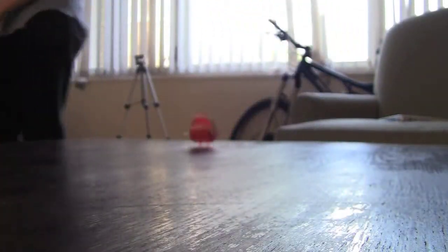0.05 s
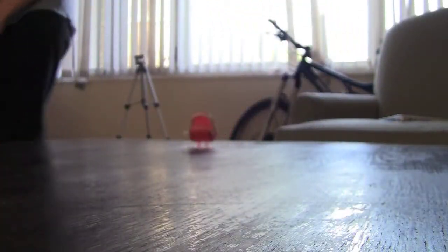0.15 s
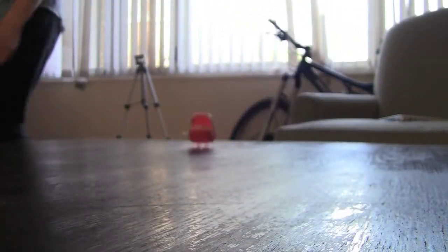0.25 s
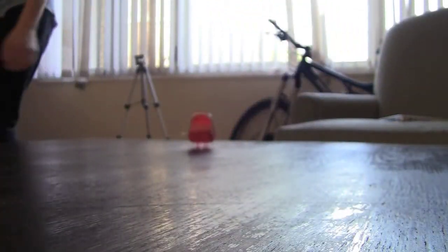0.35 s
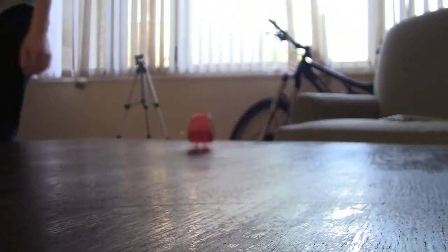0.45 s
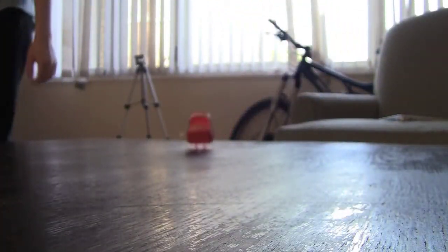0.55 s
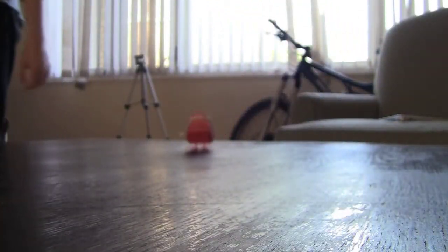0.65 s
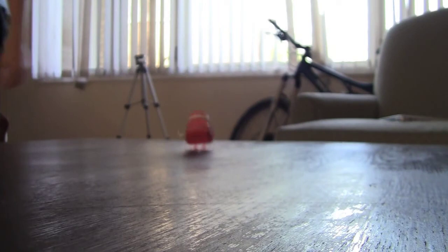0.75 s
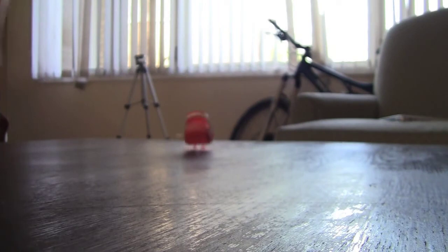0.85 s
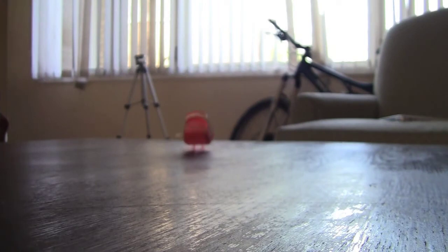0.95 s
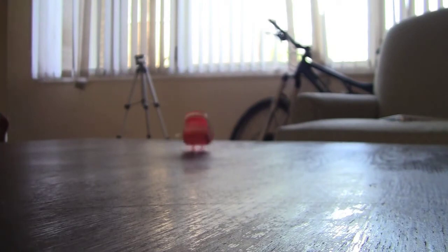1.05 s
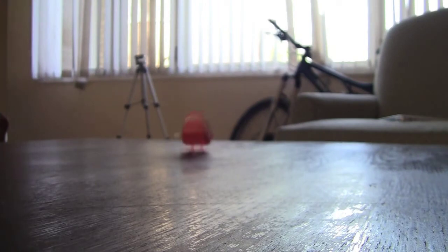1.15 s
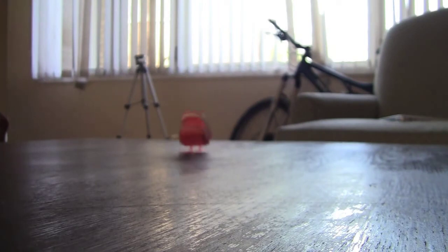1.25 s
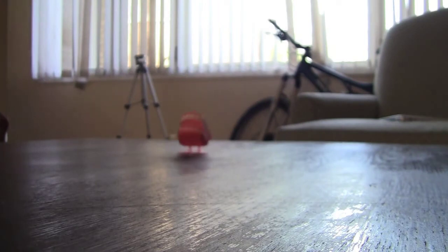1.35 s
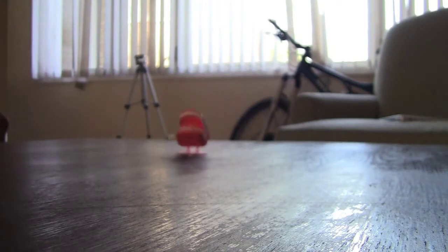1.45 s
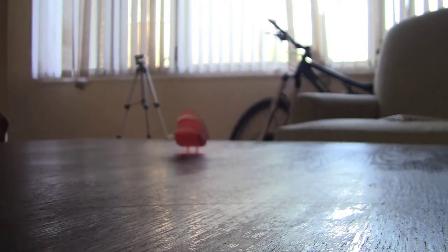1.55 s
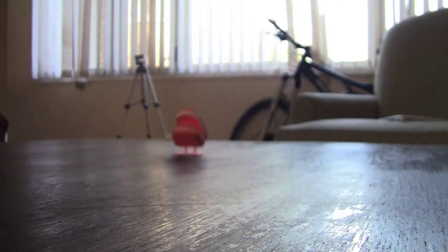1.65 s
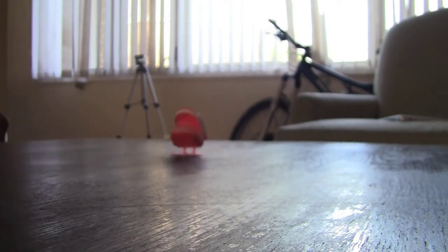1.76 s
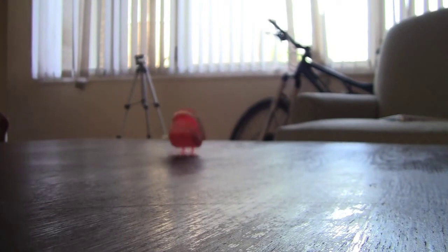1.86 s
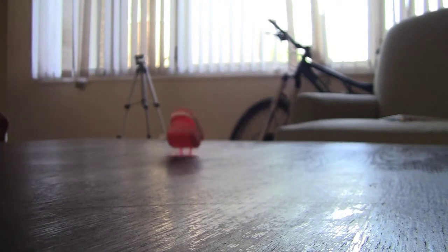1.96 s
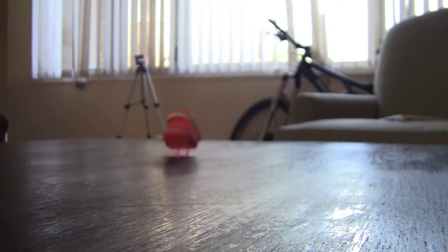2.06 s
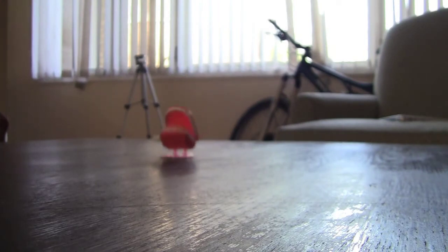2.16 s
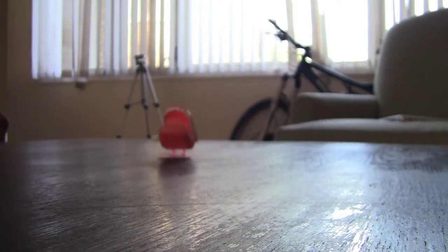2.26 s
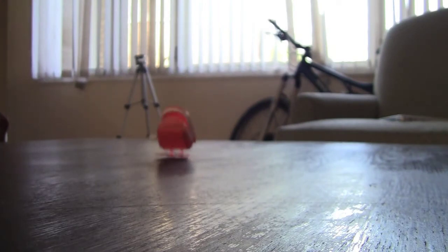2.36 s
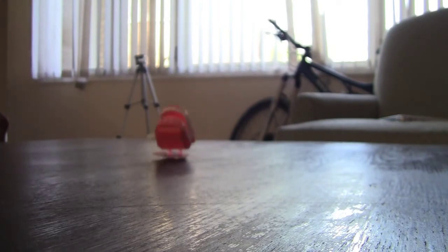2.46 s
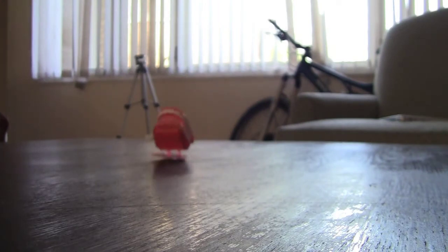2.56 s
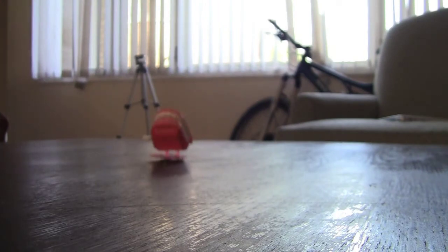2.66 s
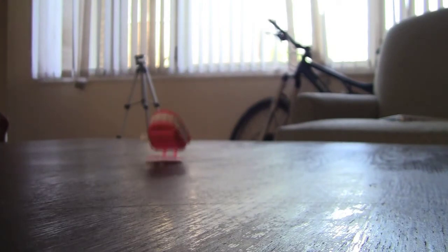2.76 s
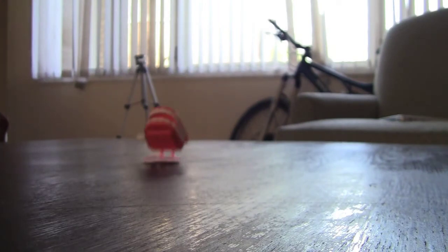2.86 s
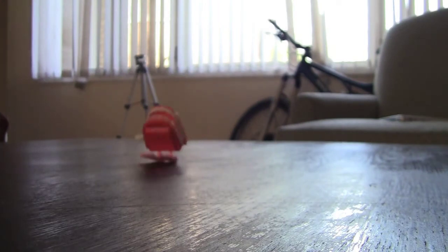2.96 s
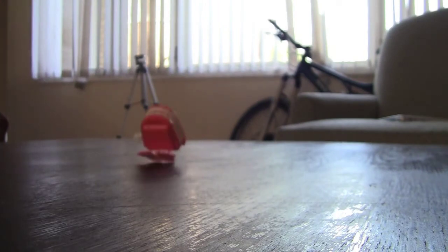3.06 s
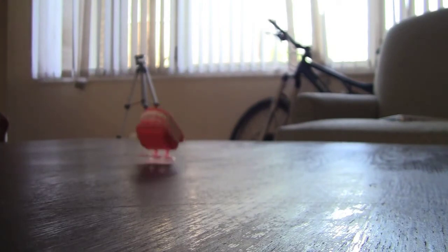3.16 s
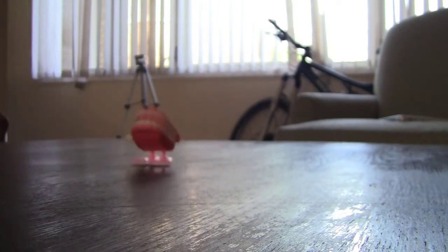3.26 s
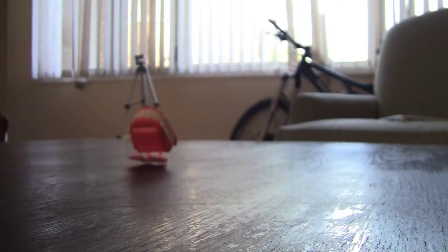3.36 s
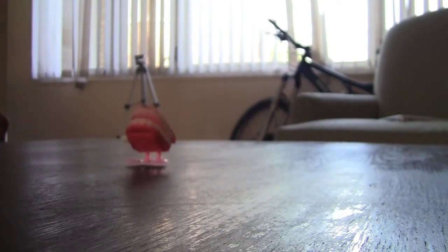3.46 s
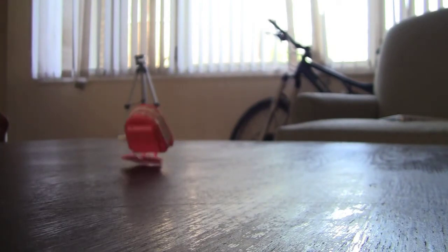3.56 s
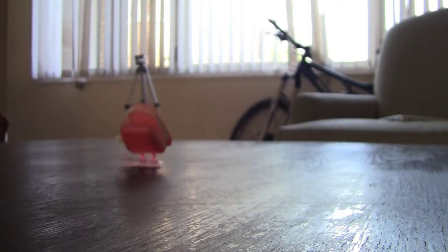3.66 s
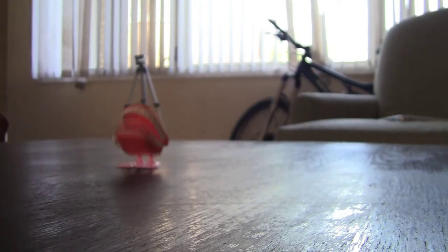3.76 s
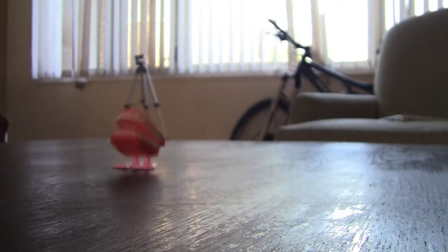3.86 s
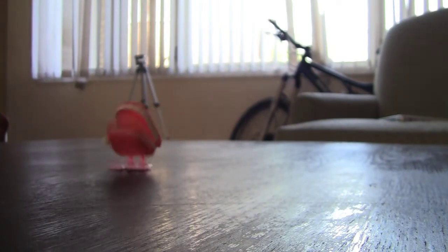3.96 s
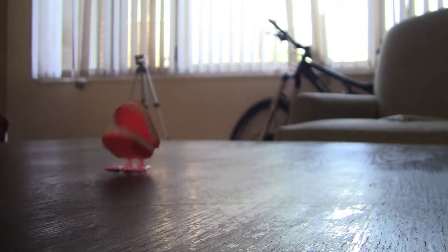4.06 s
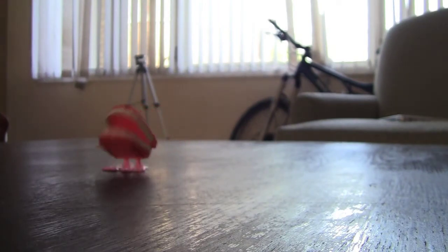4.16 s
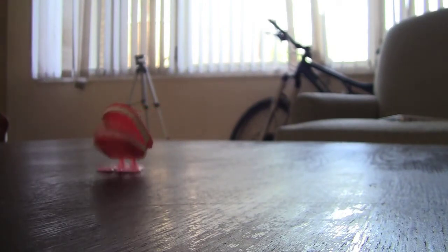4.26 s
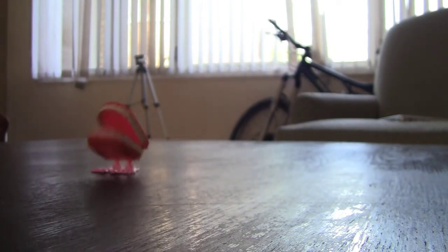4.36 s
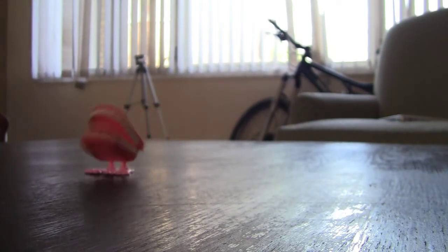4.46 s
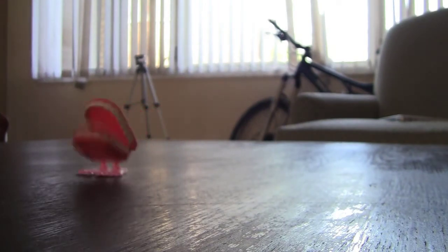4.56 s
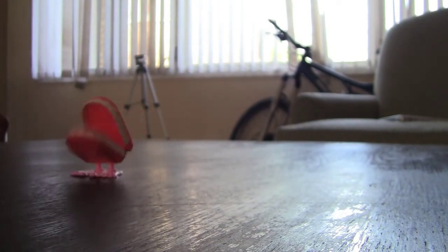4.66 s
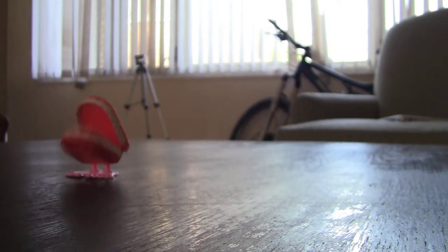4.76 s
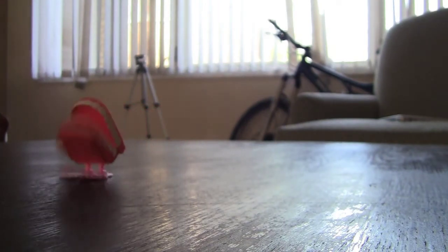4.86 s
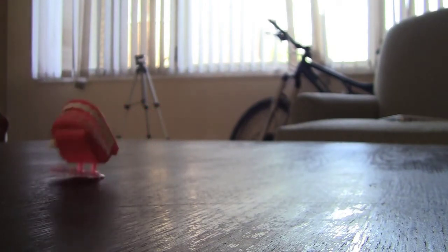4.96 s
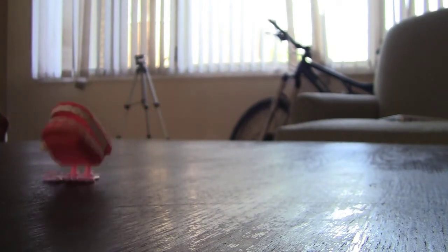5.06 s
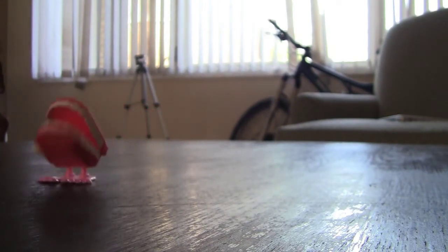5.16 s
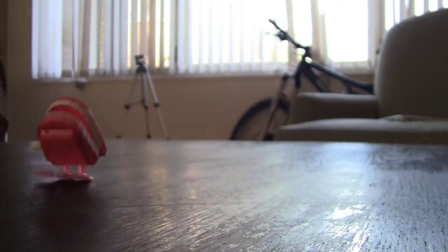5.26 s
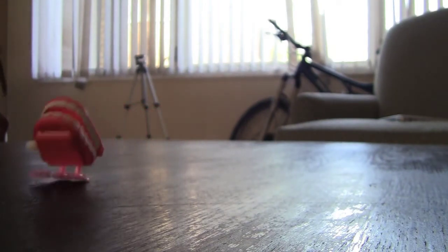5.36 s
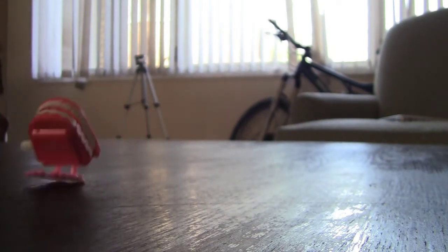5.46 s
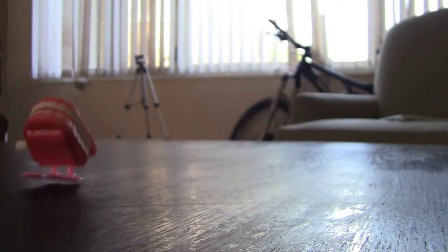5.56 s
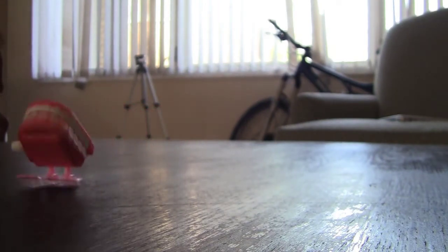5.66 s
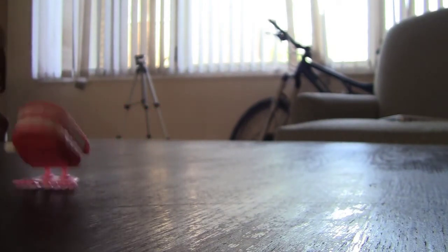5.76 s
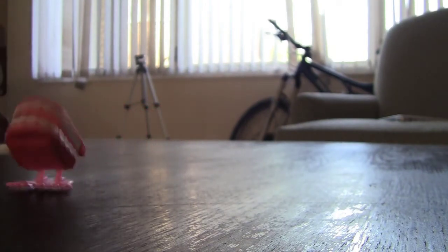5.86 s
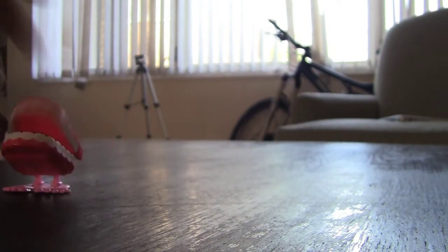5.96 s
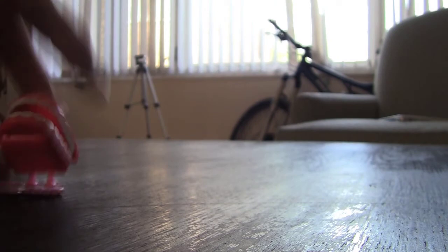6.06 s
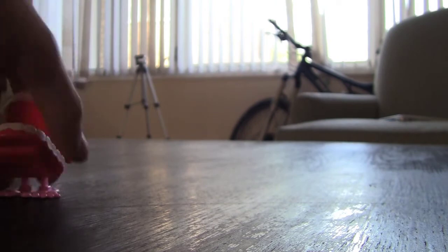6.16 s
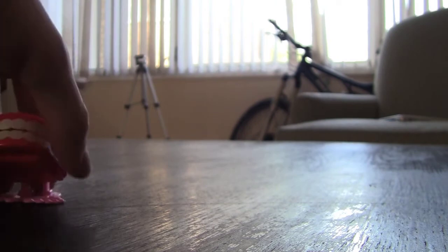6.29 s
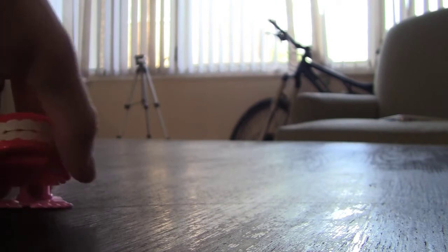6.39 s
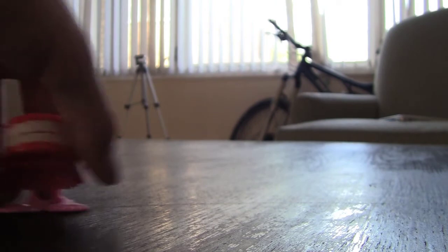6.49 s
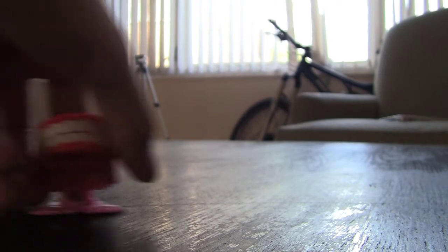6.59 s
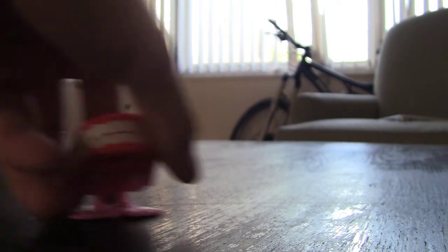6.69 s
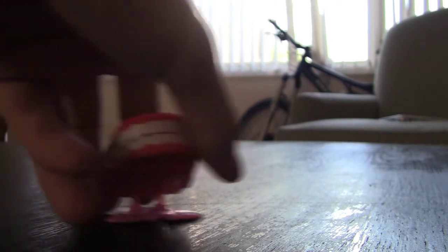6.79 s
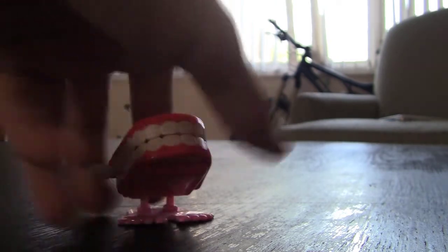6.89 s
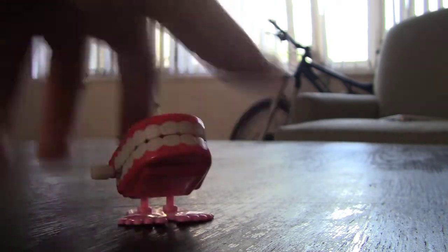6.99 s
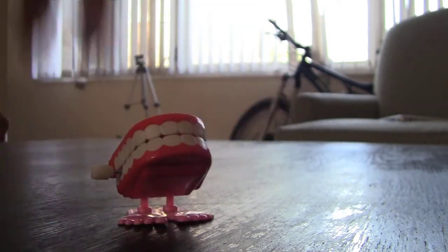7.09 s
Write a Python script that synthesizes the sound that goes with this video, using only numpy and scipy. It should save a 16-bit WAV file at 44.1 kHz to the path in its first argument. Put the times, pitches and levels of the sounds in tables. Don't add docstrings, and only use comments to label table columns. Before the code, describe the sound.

A small wind-up toy snaps its plastic jaws about ten times a second on wood, then is caught, handled and set down in a quiet room.

```python
import sys
import numpy as np
from scipy import signal
from scipy.fft import rfft, irfft
from scipy.io import wavfile
from scipy.ndimage import uniform_filter1d

SR = 44100
rng = np.random.default_rng(int(sys.argv[2]) if len(sys.argv) > 2 else 0)


def file_out(sig):
    cols = np.atleast_2d(sig).T
    lim = np.clip(cols, -1, 1)
    pcm = np.round(lim * 32767).astype(np.int16)
    wavfile.write(sys.argv[1], SR, pcm)


def level_to_linear(level):
    exponent = np.asarray(level, float) / 20
    return 10 ** exponent


N = 314433

# (frequency [Hz], density [dB per Hz])
RUSTLE_COLOUR = [(900, -11.5), (2500, -8), (3300, -15.5), (4300, -12.5), (5900, -19.5), (7000, -17.5),
                 (11500, -21), (15000, -52)]
RUSTLE_DB = -53.5
# (time [s], level [dB])
SLEEVE = [(0, 6), (6.45, 5), (6.58, 3.5), (6.68, 3), (6.85, 6), (7.0, 0), (7.13, -4)]
# (frequency [Hz], level [dB])
HUM = [(326, -62), (361, -56), (520, -63), (740, -61.5)]
# (frequency [Hz], level [dB])
MOTORS = [(121.2, -49.5), (102, -55.5)]
MOTORS_MEET_S = 6.835
# (time [s], level [dB])
RUMBLE = [(0, -37), (2.4, -44.5), (6.15, -51.5), (6.25, -42.5), (6.45, -39), (6.65, -41), (6.85, -43),
          (7.13, -43)]
# (frequency [Hz], density [dB per Hz])
RUMBLE_COLOUR = [(15, -65), (25, -16), (64, -11), (108, -1), (212, -2), (306, 0.5), (578, -3.5),
                 (866, -16.5), (1030, -6), (1130, -15.5), (2500, -47), (3250, -64), (5500, -120)]
AIRBORNE_DB, AIRBORNE_S = -11, 0.046

# (time [s], rattle level [dB])
GEARS = [(0, -30.5), (1, -31), (3, -37.5), (5, -39.5), (6.05, -42), (6.12, -45.5), (6.25, -40), (6.4, -75),
         (6.55, -75)]
# (frequency [Hz], density [dB per Hz])
GEAR_COLOUR = [(900, -5), (1500, -9), (2500, 0), (3400, -2.5), (4050, -4.5), (4500, -7.5), (5000, -2.5),
               (6200, -7.5), (6800, -0.5), (7500, -8.5), (9900, -14.5), (11000, -10.5), (12000, -20),
               (15000, -85)]
# (frequency [Hz], level [dB], t60 [s])
CASING = [(4520, -11.5, .022), (6760, -15.5, .014), (9800, -13, 0.013), (2640, -17, 0.016)]

# (cam lift [s], jaw snap [s], lift [dB], snap [dB])
CAM_TURNS = [(.0212, .0381, -16.5, -3.5), (.101, .1286, -13.5, -10.5), (.2221, .2396, -15, -3.5),
             (.302, .3346, -15.5, -8), (.4146, .4446, -11, -5), (.5201, .5532, -10.5, -5),
             (.6279, .6497, -11.5, -6.5), (.7182, .7459, -12, -6), (.8247, .8399, -10, -1),
             (.9278, .9429, -9.5, -3), (1.0299, 1.0498, -14, -3.5), (1.1242, 1.1463, -12, -5),
             (1.2201, 1.2467, -11, -7), (1.3244, 1.3381, -9.5, -5), (1.4239, 1.4444, -10.5, -3.5),
             (1.5202, 1.5359, -11.5, -5), (1.6177, 1.6423, -13, -8.5), (1.7195, 1.7377, -12, -4),
             (1.8073, 1.8339, -14.5, -8), (1.9214, 1.952, -12.5, -9), (2.027, 2.0547, -13, -8),
             (2.1262, 2.151, -13.5, -11.5), (2.2211, 2.2424, -16.5, -5), (2.31, 2.3531, -17, -6.5),
             (2.432, 2.4693, -14, -9), (2.5422, 2.5781, -13, -8), (2.6475, 2.6782, -15, -4),
             (2.7441, 2.7689, -15.5, -8), (2.8477, 2.862, -16.5, -6), (2.9501, 2.9589, -17.5, -10),
             (3.055, 3.0845, -15.5, -9), (3.159, 3.1973, -13.5, -6), (3.283, 3.3097, -13, -5),
             (3.3839, 3.4032, -12.5, -3), (3.4733, 3.4994, -14.5, -7), (3.5785, 3.597, -15, -3.5),
             (3.6684, 3.7043, -15, -8.5), (3.788, 3.822, -15.5, -5), (3.8994, 3.9285, -16, -8.5),
             (4.0074, 4.0262, -14, -3), (4.096, 4.1312, -17, -8.5), (4.216, 4.2425, -17.5, -7),
             (4.314, 4.337, -14, -3.5), (4.406, 4.435, -14, -7.5), (4.5126, 4.541, -13.5, -6.5),
             (4.6227, 4.642, -15, -2.5), (4.707, 4.744, -16.5, -7.5), (4.82, 4.8487, -15.5, -7),
             (4.922, 4.9628, -16, -7.5), (5.039, 5.0735, -12, -4), (5.1548, 5.1754, -13, -2.5),
             (5.251, 5.2691, -17, -2.5), (5.345, 5.3739, -15, -9), (5.459, 5.4887, -14.5, -8),
             (5.5632, 5.602, -15, -8), (5.6771, 5.71, -14, -8), (5.7853, 5.811, -16, -7),
             (5.89, 5.9036, -12.5, -0.5), (5.9855, 6.0013, -12.5, 1)]
HOPS = CAM_TURNS
# (snap tick lean [dB an octave], spring ring [dB], latch [dB])
QUIRKS = [(-1, 10, 2.5), (0.0, 9, 6), (2, 12, 0.0), (7, 2, 2), (6, -4.0, 1), (1, 14, 2), (0, 5, 7),
          (4.5, -0.5, -8), (-3.0, 9, 0.0), (-1, -1.5, 0.0), (1, -8.5, 4), (4, 7, 4.5), (3, 0.0, -4),
          (-10, -1.5, 0.0), (8, 6, 9), (-6, 7, 0.0), (1.0, 7, -1.5), (-2, -12.0, 0.0), (1.5, 10.5, 1.5),
          (1, -19.0, 1), (2, -5, 3), (1.0, 9, 4), (3.5, 7, 4), (0.0, -6, 0), (-2, -7.5, -3), (5, -4.5, 1),
          (-1, -6.0, 1), (0.5, 4.5, 6), (-5, 6, 0.0), (2, 2, 0.0), (-2.5, 10, 0.5), (4.5, 3, 1), (1, 1, 3),
          (-5, 4, 0.0), (-2.0, 6.5, 3), (-3, 1, 0.0), (6, 7.5, 1.0), (8.5, -9.5, 2.5), (0, 8, 3.5),
          (-5, 1.5, 0.0), (5.5, 9, 3.5), (2.5, -16.5, 4.5), (1, 6, -4), (3, 9, 0), (1, 7, -1),
          (-1.5, 4, 0.0), (6, -10, 0), (-1, 0.0, 3.5), (-3, -12.5, 0), (2, -2, 1.0), (2, 6, 4.5),
          (-4.5, -12, 0.0), (2, -7.0, 1.0), (0, 7, 0), (3, 2.0, -0.5), (7, 1, -0.5), (1, -9, 3),
          (-4, 2.0, 0.0), (-4, -8.0, 0.0)]
# (snap knock lean [dB an octave], latch lateness [ms])
SKEWS = [(1.0, 0.0), (5, 0.3), (2, 0.0), (11, -0.6), (3, 1.5), (-1, 0.6), (-1.5, 0), (-1.5, 1), (-1.5, 0.0),
         (1, 0.0), (0, 2.7), (-1.5, 1.5), (0, 1), (3, 0.0), (0, -0.1), (-5.5, 0.0), (-0.5, 3), (-3, 0.0),
         (0, -1), (-1.5, 1), (1, 0), (-4, 2.5), (-3, 0.5), (-3.5, 0.2), (-10, -1), (3, 2), (0, 1),
         (-1.5, 4), (-2.5, 0.0), (-1.5, 0.0), (-1.5, -0.5), (-1.5, 0.4), (-2.5, 0.6), (-0.5, 0.0),
         (0, -0.5), (1, 0.0), (-5.5, 0.5), (0.5, 0.0), (-1.5, 0.4), (-3, 0.0), (-3, -1.0), (4, -2),
         (0.5, 0.1), (-1, 0.6), (-2, 0.5), (-1, 0.0), (-4, -1.3), (0.5, -0.8), (-5, 0.2), (-1, 1),
         (-1.5, 0.1), (-3, 0.0), (1, -2), (1.5, -0.5), (-1.0, 0.0), (-0.5, -0.5), (-2.5, -0.2), (-5, 0.0),
         (-4, 0.0)]
# (time [s], shell level [dB], table level [dB])
REBOUNDS = [(0.091, -25, -34), (0.358, -42, -23.5), (0.476, -17.5, -21), (0.5863, -15.5, -19),
            (0.6993, -19, -20.5), (.78, -22, -20.5), (0.8976, -16, -20), (0.996, -23, -20),
            (1.18, -22, -21.5), (1.3997, -17, -21), (1.4853, -23, -23), (1.7895, -13, -32),
            (1.972, -25, -24.5), (2.0907, -26, -28.5), (2.1921, -22.5, -25.5), (2.2883, -25, -30),
            (2.495, -23, -27), (2.6046, -22, -24.5), (2.7043, -24, -32), (2.9196, -22, -26),
            (3.0217, -18, -26.5), (3.4524, -20, -30), (4.079, -18, -31), (4.4651, -26, -30),
            (4.761, -24, -31), (4.979, -20, -23.5), (5.1002, -23, -29), (5.31, -20, -29.5),
            (5.8416, -27, -31), (6.0435, -18.5, -24.5)]

# (frequency [Hz], level [dB], t60 [s])
TABLE = [(128, -4.5, 0.18), (187, 5, 0.053), (244, -1, 0.073), (318, 0.5, 0.13), (405, 4, 0.089),
         (530, -0.5, 0.081), (769, 5, 0.045), (867, 3, 0.057), (1036, 3.5, 0.063), (1161, 1.5, 0.056),
         (1362, 7, 0.032), (1705, 5, 0.016)]
# (time [s], middle modes [dB], top modes [dB])
EDGE = [(0, 0, 9.5), (2.3, 12, 7.5), (3.5, -9, 3), (5, 6, 3.5), (6.2, 2.5, 8.5)]
# (time [s], level [dB])
FOOTFALL = [(0, -28.5), (.6, -27), (2.2, -27.5), (3.5, -32), (5, -31.5), (6, -32.5)]
FOOT_LEAD_S, FOOT_SHARE, USUAL_LIFT_DB = 0.00153, 1, -18
# (time [s], level [dB])
TOUCHES = [(1.079, -22), (1.274, -20.5), (1.58, -25.5), (1.668, -25), (1.856, -27), (1.909, -28),
           (2.112, -34), (2.418, -31), (2.527, -27), (2.633, -28), (2.803, -25.5), (3.104, -29),
           (3.144, -27), (3.214, -24.5), (3.269, -29), (3.345, -24.5), (3.518, -37), (3.64, -30),
           (3.954, -28.5), (4.375, -28), (4.571, -31), (4.611, -37), (4.866, -38), (4.907, -34),
           (5.512, -31.5), (5.547, -42), (5.728, -26.5), (5.952, -25)]
TOUCH_DB = -2
# (time [s], level [dB])
TAPS = [
    (0.152, -18),
    (0.161, -16),
    (0.192, -18),
]
# (frequency [Hz], level [dB], t60 [s])
TAP_MODES = [(1223, -4, 0.008), (1490, 3.5, 0.011), (1750, 3, 0.0086), (2050, -12, 0.0078)]
# (time [s], level [dB])
BUMPS = [
    (6.216, -20.5),
    (6.224, -30),
    (6.237, -25),
    (6.249, -39),
    (6.27, -28.5),
    (6.294, -29.5),
]

# (frequency [Hz], level [dB], t60 [s])
CAM_KNOCK = [(1560, -29, 0.0051), (2230, 3.5, 0.003), (2710, 5, 0.0076), (3960, 0.5, 0.013),
             (4560, -52, 0.0024)]
# (frequency [Hz], level [dB], t60 [s])
CAM_TICK = [(5306, -1.5, 0.0072), (5740, -1, 0.005), (6780, 2.5, 0.0048), (8650, -7, 0.0081),
            (9460, -5, 0.0074), (10500, 5.5, 0.0037), (13500, -32, 0.0027)]

# (frequency [Hz], level [dB], t60 [s])
KNOCK = [(1484, -8.5, 0.0028), (2237, 4.5, 0.0018), (2830, 4.5, 0.0024), (3492, -5, 0.006),
         (3860, -6.5, 0.0044), (4437, -9.5, 0.011)]
# (frequency [Hz], level [dB], t60 [s])
TICK = [(5096, -6.5, 0.014), (5710, -6, 0.0095), (6716, -0.5, 0.013), (8107, 0.5, 0.0087),
        (8995, 2.5, 0.011), (9720, 2, 0.015), (10440, 5, 0.0038), (13360, -18, 0.0089)]
# (frequency [Hz], level [dB], t60 [s])
GRIPPED = [(1710, -7, 0.0035), (2305, -2, 0.0053), (2870, -4.5, 0.006), (3990, -9.5, 0.0051),
           (5710, -8.5, 0.0031)]
# (time [s], slope [dB an octave])
TICK_LEAN = [(0, 10), (.3, -3), (.8, 3), (2, -1), (3.2, 0.5), (4.5, -0.5), (6.1, -0.5), (6.25, -3),
             (7.1, -3)]
# (time [s], level [dB])
SNAP_BRIGHT = [(0, 3.5), (1.3, 9), (3, 5.5), (6, 5.5)]
LIFT_BRIGHT_DB, REBOUND_BRIGHT_DB = 5.5, 6.5
LATCH_S, LATCH_KNOCK_DB, LATCH_TICK_DB = .019, -11.5, 5.5
LATCH_CLEAR_S, LATCH_LEAD_S = .0197, .002
BOUNCE_S, BOUNCE_KNOCK_DB, BOUNCE_TICK_DB = .0013, -17.5, -2
SCUFF_DB, SCUFF_S = -27.5, 0.0032
# (time [s], knock level [dB], tick level [dB])
RELEASE = [
    (0.163, -21, -8),
    (0.17, -18, -4),
    (0.1899, -17, -12.5),
    (0.1959, -16.5, -5.5),
    (0.215, -26, -25),
]
# (time [s], knock level [dB], tick level [dB])
CATCHES = [(0.2823, -19, -18), (2.4176, -32, -33), (2.976, -25, -12), (3.2175, -18, -18),
           (3.2702, -31, -31), (3.346, -31, -24), (3.77, -53, -47), (4.1987, -36, -35), (4.3756, -27, -21),
           (4.4994, -34, -27), (4.572, -29, -19), (4.8014, -32, -27), (4.8173, -21, -20),
           (4.9076, -36, -37), (5.0254, -36, -30), (5.214, -23, -21), (5.441, -38, -51), (5.515, -24, -23),
           (5.952, -20, -15)]
# (time [s], knock level [dB], tick level [dB])
HANDLED = [(6.146, -9, 1), (6.1545, -10.5, -7), (6.1759, -17, -7.5), (6.2155, -13, -6), (6.2268, -29, -41),
           (6.237, -11.5, -24), (6.2735, -31, -33), (6.2834, -26, -34), (6.2935, -22.5, -25),
           (6.325, -32.5, -60), (6.381, -5.5, -4), (6.392, -19, -17), (6.396, -13, -29),
           (7.007, -9.5, -11.5), (7.0104, -9.5, -17), (7.0142, -18, -29), (7.0178, -18, -32),
           (7.022, -27, -42)]
# (time [s], knock level [dB], tick level [dB])
BRUSHES = [
    (6.468, -39, -43),
    (6.54, -39, -60),
    (6.915, -50, -41),
    (7.044, -34, -62),
]

# (frequency [Hz], level [dB], t60 [s])
SPRING = [(2354, 0, .15), (2270, -10, .04), (2450, -9, .04), (2600, -10, .03), (2750, -13, .02)]
# (time [s], ring level [dB])
RINGS = [(.275, -26), (.452, -19.5), (.658, -17), (0.754, -24), (0.848, -20), (1.185, -29.5), (1.256, -22),
         (1.745, -23), (2.252, -28), (2.588, -26), (2.871, -33), (3.089, -29.5), (3.832, -32),
         (4.25, -26.5), (4.443, -25), (4.857, -21.5), (4.971, -24), (5.275, -23), (5.494, -23.5),
         (5.819, -26), (6.009, -18), (6.184, -30)]
RING_DELAY_S, RING_DB, RING_SHARE, REBOUND_RING_DB = .0085, -31, 0.63, -23.5
REBOUND_RING_FADE_DB_PER_S = 2

# (time [s], level
# [dB], frequency # [Hz], t60 [s])
THUMPS = [(.37, -40, 48, 0.19), (4.915, -29.5, 55, 0.23), (5.46, -34, 50, 0.28), (1.738, -40, 45, 0.032),
          (2.2427, -40, 45, .03), (2.678, -42, 45, 0.027), (3.595, -30, 45, 0.033), (4.025, -18, 45, 0.037),
          (4.338, -27, 45, .03), (4.642, -23, 45, .03), (5.812, -28, 45, .03), (6.002, -36, 45, 0.032),
          (6.219, -27, 107.5, 0.25), (6.28, -35, 75, .3)]
# (time [s], level [dB])
NAILS = [(6.677, -32), (6.711, -34), (6.7415, -52), (6.755, -53), (6.789, -53), (6.817, -48), (6.847, -41),
         (6.865, -46), (6.885, -55), (6.925, -56), (6.967, -47)]
# (frequency [Hz], level [dB], t60 [s])
NAIL_MODES = [(1960, -11, 0.012), (2500, 1, 0.016), (3340, -8, .008), (4500, -14, .012)]

# (frequency [Hz], t60 [s])
ROOM_T60 = [(300, 0.55), (2500, .21), (10000, 0.11)]
# (frequency [Hz], side minus mid [dB])
APART = [(30, -22), (200, -24), (640, -16.5), (1400, -21), (3100, -26), (6800, -13.5), (9500, -21.5),
         (12500, -2)]
# (frequency [Hz], angle [radians])
TURN = [(500, 1.4), (1400, 1.9), (6800, 1.75), (9500, 2), (12500, 2.1)]


def evened(x):
    return x / np.sqrt(np.mean(x ** 2) + 1e-20)


def read(points, hz):
    f, value = np.transpose(points)
    return np.interp(np.log(hz + 1), np.log(f + 1), value)


def at_time(rows, s):
    return np.interp(s, *np.transpose(rows))


def follow(rows):
    return level_to_linear(at_time(rows, np.arange(N) / SR))


def add(mix, s, sound):
    part = mix[max(round(s * SR), 0):][:len(sound)]
    part += sound[:len(part)]


def coloured(x, colour):
    gain = level_to_linear(read(colour, np.fft.rfftfreq(N, 1 / SR)))
    return evened(irfft(rfft(x) * gain, N))


def no_bass(x):
    return signal.sosfilt(signal.butter(2, 1000, "high", fs=SR, output="sos"), x)


def ringing(hz, t60, t):
    return level_to_linear(-60 * t / t60) * np.sin(2 * np.pi * hz * t)


def leaned(modes, slope_db):
    centre = max(modes, key=lambda mode: mode[1])[0]
    return [(hz, db + slope_db * np.log2(hz / centre), t60) for hz, db, t60 in modes]


def strike(modes, chance, spread_db, chatter_db, chatter_s, head_s, size):
    t = np.arange(size) / SR
    hz, db, t60 = np.transpose(modes)[:, :, None]
    wobble, detune = chance[:len(modes), None], .014
    sign = (-1) ** np.arange(len(modes))[:, None]
    level = sign * level_to_linear(db + spread_db * wobble)
    ring = level * ringing(hz * (1 + detune * wobble[::-1]), t60, t)
    blow = level_to_linear(chatter_db) * chance[20:] ** 3 * np.exp(-t[:len(chance) - 20] / chatter_s)
    sound = signal.fftconvolve(ring.sum(0), np.append(1, blow))[:size]
    return sound / np.sqrt(uniform_filter1d(sound ** 2, round(head_s * SR)).max())


def hum():
    hz, noise, width_hz = np.fft.rfftfreq(N, 1 / SR), rfft(rng.standard_normal(N)), 8.0
    t = np.arange(N) / SR - MOTORS_MEET_S
    steady = sum(level_to_linear(db) * np.cos(2 * np.pi * f * t) for f, db in MOTORS)
    wavering = sum(level_to_linear(db) * evened(irfft(noise / (1 + ((hz - f) / width_hz) ** 2), N)) for f, db in HUM)
    return steady + wavering


def scuffs():
    z = signal.stft(coloured(rng.standard_normal(N), RUSTLE_COLOUR), nperseg=256)[2]
    patches, patch_db = rng.standard_normal(z.shape), 3
    patches = uniform_filter1d(patches, size=14, axis=0)
    patches = evened(uniform_filter1d(patches, size=18, axis=1))
    return evened(signal.istft(z * level_to_linear(patch_db * patches), nperseg=256)[1][:N])


def rumble():
    lumps, lump_db = evened(uniform_filter1d(rng.standard_normal(N), 1600)), 3.2
    murmur = coloured(rng.standard_normal(N), RUMBLE_COLOUR)
    wood = follow(RUMBLE) * airborne() * level_to_linear(lump_db * lumps) * murmur
    rustle = follow(SLEEVE) * level_to_linear(RUSTLE_DB + lump_db / 2 * lumps) * scuffs()
    return wood + hum() + rustle


def gears():
    spread_db, t, (hz, _, t60) = 2.2, np.arange(5000) / SR, SPRING[0]
    sizes = level_to_linear(spread_db * np.minimum(rng.exponential(1, N), 4))
    teeth = sizes * (rng.random(N) < 800 / SR)
    scrapes = signal.oaconvolve(teeth, np.exp(-np.arange(300) / 44.0))[:N]
    whir = (evened(scrapes) + 0.3) * rng.standard_normal(N)
    note = evened(signal.oaconvolve(whir, ringing(hz, t60, t))[:N])
    shell = sum(level_to_linear(db) * evened(signal.oaconvolve(whir, ringing(f, shell_t60, t[:900]))[:N])
                for f, db, shell_t60 in CASING)
    return follow(GEARS) * (shell + coloured(whir, GEAR_COLOUR) + level_to_linear(-8.0) * note)


def footfalls():
    lifts = [(s, at_time(FOOTFALL, s) + FOOT_SHARE * (db - USUAL_LIFT_DB)) for s, _, db, _ in HOPS]
    rebounds = [(s, table_db) for s, _, table_db in REBOUNDS]
    steps = [(s - FOOT_LEAD_S, db) for s, db in lifts + rebounds]
    caught = [(HANDLED[1][0], -23)]
    return steps + caught + [(s, db + TOUCH_DB) for s, db in TOUCHES]


def airborne():
    off, down = np.zeros(N), np.array(footfalls())[:, 0]
    for _, s, _, _ in HOPS:
        aloft_s = min(AIRBORNE_S, min(down[down > s]) - s)
        add(off, s, np.ones(round(aloft_s * SR)))
    return level_to_linear(AIRBORNE_DB * uniform_filter1d(off, size=100))


def landings():
    steps = footfalls()
    out, chance = np.zeros(N), rng.standard_normal((len(BUMPS + TAPS + steps), 1500))
    head_s, spread_db, skid_db = .006, 1.2, -42
    for (s, db), row in zip(BUMPS, chance):
        add(out, s, level_to_linear(db) * strike(leaned(TABLE, -1.4), row, spread_db, -24, 0.01, head_s, size=5000))
    for (s, db), row in zip(TAPS, chance[len(BUMPS):]):
        add(out, s, level_to_linear(db) * strike(TAP_MODES, row, spread_db, -2, 0.0061, head_s, size=2000))
    when, middle, top = np.transpose(EDGE)
    for (s, db), row in zip(steps, chance[len(BUMPS + TAPS):]):
        middle_db, top_db = np.interp(s, when, middle), np.interp(s, when, top)
        wood = TABLE[:6]
        wood = wood + [(hz, mode_db + middle_db, t60) for hz, mode_db, t60 in TABLE[6:8]]
        wood = wood + [(hz, mode_db + top_db, t60) for hz, mode_db, t60 in TABLE[8:]]
        add(out, s, level_to_linear(db - 3.0) * strike(wood, row, spread_db, skid_db, 0.013, head_s, size=3000))
    return out


def cam():
    out, chance = np.zeros(N), rng.standard_normal((len(HOPS), 2, 420))
    head_s, spread_db, chatter_s = .0005, 1.6, .0016
    for (s, _, db, _), (low, high) in zip(HOPS, chance):
        knock = strike(CAM_KNOCK, low, spread_db, -33.5, chatter_s, head_s, size=800)
        tick = strike(CAM_TICK, high, spread_db, -28.5, chatter_s, head_s, size=800)
        add(out, s, level_to_linear(db) * knock)
        add(out, s, level_to_linear(db + LIFT_BRIGHT_DB - 2.0) * tick)
    return no_bass(out)


def hop_clicks():
    snaps, latches, bounces = [], [], []
    for (s, snap_s, lift_db, db), (tick_lean, _, own_db), (knock_lean, late_ms) in zip(HOPS, QUIRKS, SKEWS):
        tick_db = db + at_time(SNAP_BRIGHT, snap_s)
        snaps.append((snap_s, db, tick_db, knock_lean, tick_lean))
        bounces.append((snap_s + BOUNCE_S, db + BOUNCE_KNOCK_DB, tick_db + BOUNCE_TICK_DB, knock_lean, tick_lean))
        if snap_s - s > LATCH_CLEAR_S:
            latch_s = min(s + LATCH_S + late_ms / 1000, snap_s - LATCH_LEAD_S)
            latch_db = lift_db + own_db
            latches.append((latch_s, latch_db + LATCH_KNOCK_DB, latch_db + LATCH_TICK_DB))
    rebounds = [(s, db, db + REBOUND_BRIGHT_DB) for s, db, _ in REBOUNDS]
    return snaps + latches + rebounds + bounces + CATCHES


def clicks():
    rows = HANDLED + RELEASE + hop_clicks() + BRUSHES
    out, chance = np.zeros(N), rng.standard_normal((len(rows), 2, 420))
    head_s, spread_db, held_s, grip_s = .0005, .8, 6.15, 6.2
    for (s, knock_db, tick_db, *leans), (low, high) in zip(rows, chance):
        knock_lean, tick_lean = leans or (0, 0)
        light = np.clip(-max(knock_db, tick_db) / 10, 0, 2.4)
        chatter_db = -40 + 5 * light if s < held_s else SCUFF_DB
        chatter_s = .0016 if s < held_s else SCUFF_S
        shell = leaned(KNOCK, 4.8 * light - 2.2 + knock_lean) if s < grip_s else GRIPPED
        teeth = TICK if s < grip_s else TICK[:-1]
        teeth = leaned(teeth, tick_lean + at_time(TICK_LEAN, s))
        knock = strike(shell, low, spread_db, chatter_db, chatter_s, head_s, size=800)
        tick = strike(teeth, high, spread_db, chatter_db, chatter_s, head_s, size=800)
        add(out, s, level_to_linear(knock_db) * knock)
        add(out, s, level_to_linear(tick_db - 4.5) * tick)
    return no_bass(out)


def jolts():
    snaps = [(s, RING_DB + RING_SHARE * db + own_db) for (_, s, _, db), (_, own_db, _) in zip(HOPS, QUIRKS)]
    rebounds = [(s, REBOUND_RING_DB - REBOUND_RING_FADE_DB_PER_S * s + RING_SHARE * db / 2)
                for s, db, _ in REBOUNDS]
    return [(s + RING_DELAY_S, db) for s, db in snaps + rebounds] + RINGS


def spring():
    shakes = jolts()
    out, chance = np.zeros(N), rng.standard_normal((len(shakes), 600))
    chance[:, :20] = 0
    head_s, flutter_db = .011, 3.6
    for (s, db), row in zip(shakes, chance):
        add(out, s - .008, level_to_linear(db) * strike(SPRING, row, 0, -24, 0.004, head_s, size=5000))
    flutter = uniform_filter1d(uniform_filter1d(rng.standard_normal(N), 150), 150)
    return out * level_to_linear(flutter_db * evened(flutter))


def thumps():
    out, t = np.zeros(N), np.arange(SR // 4) / SR
    for s, db, hz, t60 in THUMPS:
        onset = np.minimum(t / (0.052 * t60), 1)
        add(out, s, level_to_linear(db) * onset * ringing(hz, t60, t))
    return out


def nails():
    out, chance = np.zeros(N), rng.standard_normal((len(NAILS), 200))
    for (s, db), row in zip(NAILS, chance):
        add(out, s, level_to_linear(db) * strike(NAIL_MODES, row, 1.5, -24, .002, .002, size=1500))
    return out


def room(x):
    taps = np.zeros(SR // 2)
    at = np.arange(250, len(taps) - 20, 20)
    taps[at + rng.integers(0, 20, len(at))] = rng.choice([-1., 1.], len(at))
    hz, t, z = signal.stft(taps, SR, nperseg=256)
    decay = level_to_linear(-60 * t / read(ROOM_T60, hz)[:, None])
    tail = signal.istft(z * decay, SR, nperseg=256)[1]
    return signal.fftconvolve(x, tail / np.linalg.norm(tail))[:N]


def ports(near, far):
    hz = np.fft.rfftfreq(N, 1 / SR)
    turned = np.exp(1j * read(TURN, hz)) * rfft(near)
    around = 1.5 * rfft(np.roll(far, 900))
    side = irfft(level_to_linear(read(APART, hz)) * (turned + around), N)
    return near + far + np.array([side, -side])


def scene():
    struck, room_db = clicks() + cam() + airborne() * landings() + spring() + nails(), -18
    far = level_to_linear(room_db) * room(struck) + gears() + rumble()
    return ports(struck, far) + thumps() * level_to_linear([[-1.2], [1.2]])


def low_pass(x):
    return signal.sosfilt(signal.butter(12, 16680, fs=SR, output="sos"), x)


def record(dry):
    dry = signal.sosfilt(signal.butter(1, 110, "high", fs=SR, output="sos"), dry)
    dry = signal.sosfilt(signal.butter(6, 12800, fs=SR, output="sos"), dry)
    power_db = 10 * np.log10(uniform_filter1d((dry ** 2).mean(0), 44, origin=21) + 1e-12)
    fall = np.arange(N) * 88.2 / SR
    held_db = np.maximum.accumulate(power_db + fall) - fall
    over_db = np.maximum(held_db + 14.5, 0)
    duck_db = signal.lfilter([.02], [1, -.98], .9 * over_db)
    limited = np.clip(dry / level_to_linear(duck_db), -.95, .95)
    edge = signal.firwin(255, 16500, window=("kaiser", 8), fs=SR)[None]
    return low_pass(signal.oaconvolve(limited, edge, "same"))


dry = scene()
out = record(dry)
file_out(out)
```